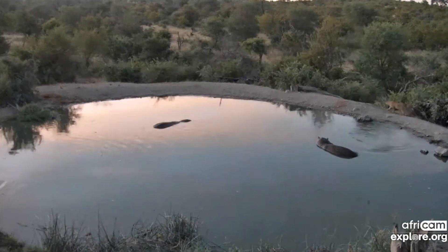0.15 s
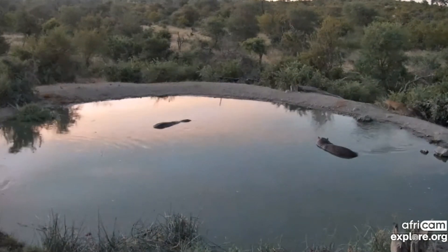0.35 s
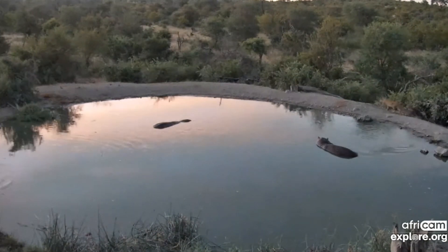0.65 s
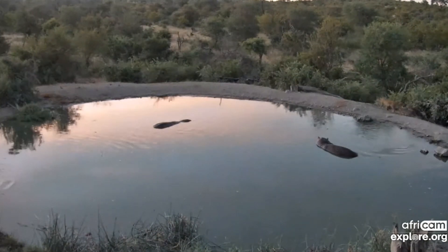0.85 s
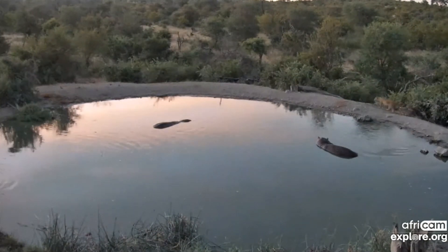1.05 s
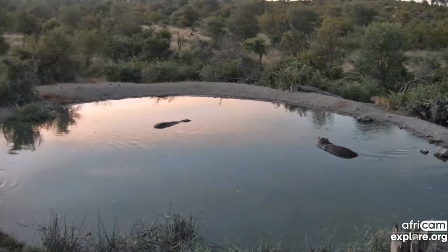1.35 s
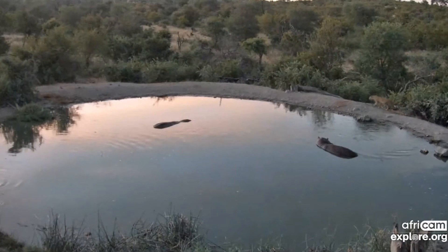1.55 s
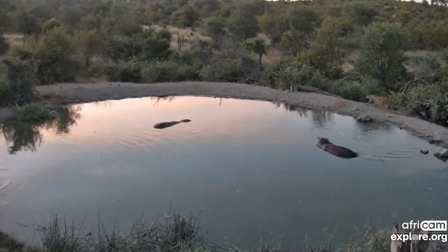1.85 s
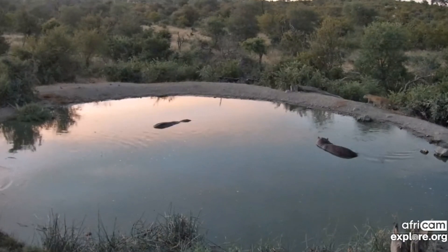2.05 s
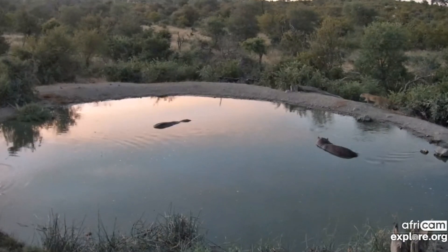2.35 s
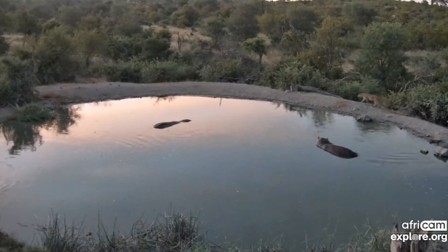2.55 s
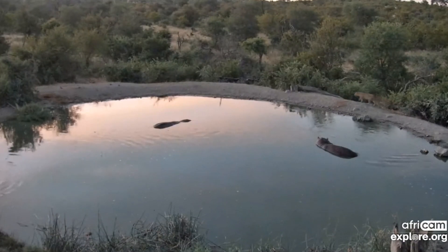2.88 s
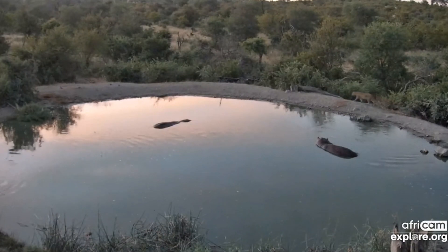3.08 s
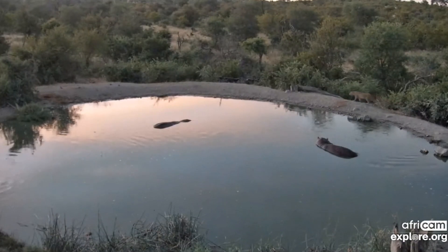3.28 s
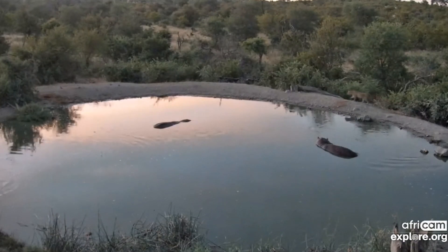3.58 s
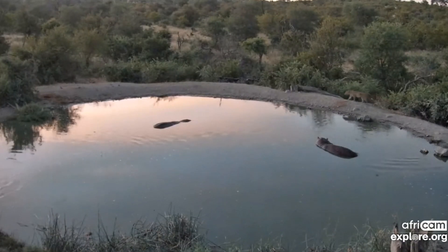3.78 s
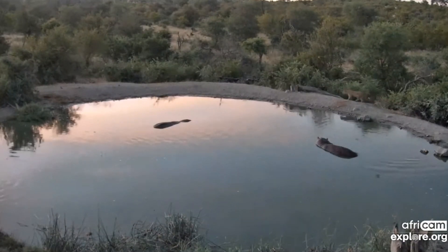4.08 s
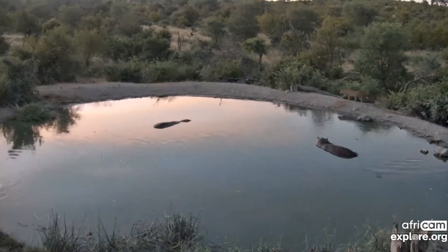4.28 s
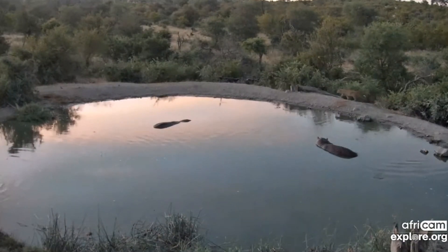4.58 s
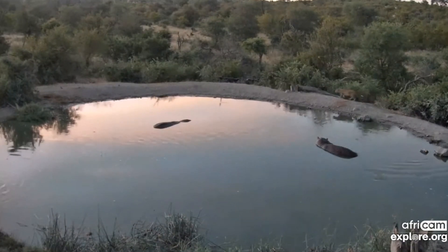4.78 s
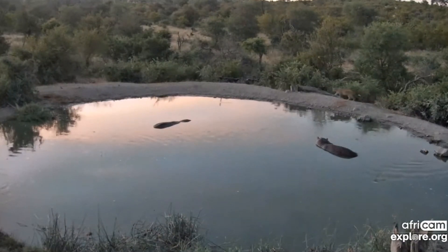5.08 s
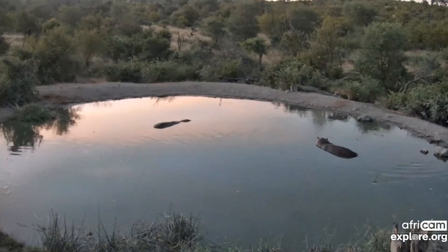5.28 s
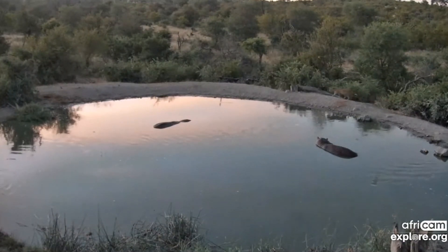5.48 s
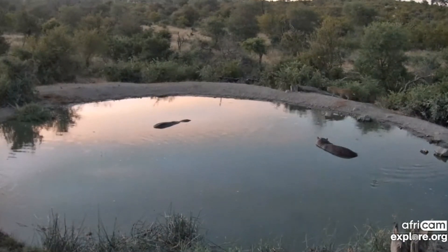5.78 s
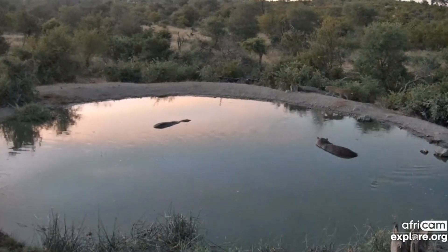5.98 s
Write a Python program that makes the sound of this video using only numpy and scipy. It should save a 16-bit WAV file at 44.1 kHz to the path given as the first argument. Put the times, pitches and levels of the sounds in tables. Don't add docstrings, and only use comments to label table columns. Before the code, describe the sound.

At a waterhole at dusk, crickets chirp steadily over a faint insect hiss and barely audible hum. A few small drips plink. A faint distant bird calls, then a nightjar whistles two rising, swooping phrases, the second ending in a rapid sinking trill. A nearer bird answers with two short nasal squawks, the second harsher. Open air, whistles echoing softly off trees, distant fixed microphone.

```python
import sys
import numpy as np
from scipy import signal
from scipy.fft import rfft, irfft
from scipy.io import wavfile
from scipy.ndimage import uniform_filter1d

SR = 44100
rng = np.random.default_rng(int(sys.argv[2]) if len(sys.argv) > 2 else 0)


def master(y):
    cut = np.clip(np.atleast_2d(y).T, -1, 1)
    pcm = np.round(cut * 32767)
    wavfile.write(sys.argv[1], SR, pcm.astype(np.int16))


def linear_from_db(decibels):
    return 10 ** (np.asarray(decibels, float) / 20)


N = 270774
TIME = np.arange(N) / SR

# frequency in Hz, level in dB.
HUM_LINES = [(75, -91), (125, -87), (150.2, -70.5), (250, -76.5), (350, -78.5)]
# frequency in Hz, density in dB per Hz.
BUSH_SPECTRUM = [(40, -42), (70, -28), (110, -15.5), (150, 0.5), (219, -6), (450, -10), (760, -19),
                 (1250, -9), (2100, -9.5), (3200, -4), (4300, -6.5), (5300, -9), (7800, -18.5),
                 (12000, -17)]
BUSH_DB = -51
# start in seconds, end in seconds, level in dB.
SINGER_SPELLS = [
    (0, .65, -66),
    (2.4, 2.702, -64),
    (3.75, 4.35, -66),
    (5.0, 5.7, -64),
]
SINGER_HZ, SINGER_WIDTH_HZ = 4207, 110
# frequency in Hz, width in Hz, level in dB.
WING_MODES = [
    (4440, 220, 12.5),
    (4720, 245, 16),
    (5030, 220, 13),
]
UPPER_WING_DB = -1.16
# start in seconds, end in seconds, level in dB, share of the low wing mode 0-1.
CHIRPS = [(0, 0.067, -53.5, 1), (0.19, .51, -58.5, .5), (.683, 0.947, -48.5, 0.9),
          (1.285, 1.694, -53.5, 0.5), (1.878, 2.163, -47.5, 0.93), (2.537, 2.778, -53.5, .5),
          (2.985, 3.256, -48.5, 0.94), (3.696, 3.894, -56, 1), (4.124, 4.32, -52, .5),
          (4.5, 4.625, -49.5, .8), (4.64, 4.854, -58, .5), (5.036, 5.292, -53.5, 0.6),
          (5.448, 5.61, -56, .8), (5.607, 5.85, -49, 1), (5.948, 6.138, -56, .5)]
# start in seconds, peak level in dB, bubble pitch in Hz, 60 dB decay time in seconds.
DRIPS = [
    (.024, -35, 1296, 0.029),
    (1.225, -43.5, 504, 0.03),
    (5.46, -38.5, 1350, 0.026),
]
# time in seconds, voice pitch in Hz, level in dB.
FAR_CALL = [
    (2.0, 520, -61),
    (2.03, 550, -60.5),
    (2.07, 584, -61),
    (2.1, 590, -64),
    (2.149, 590, -66),
    (2.18, 552, -57),
]
# time in seconds, voice pitch in Hz, level in dB, roughness 0-1.
SQUAWKS = [
    [(4.312, 670, -51, .12), (4.335, 749, -42, .18), (4.36, 858, -40, .25), (4.38, 990, -34, 0.1),
     (4.405, 1053, -33, .03), (4.445, 1077, -33, 0.08), (4.495, 1056, -33, 0.07), (4.512, 977, -38, 0.33)],
    [(4.603, 1030, -42.5, .45), (4.625, 1019, -35, 0.34), (4.655, 1033, -37, .3), (4.67, 1019, -41.5, .22),
     (4.71, 1028, -39.5, .22), (4.735, 997, -42.5, 0.46), (4.758, 945, -50, .7)],
]
# overtone of the voice, multiple of the flutter added,
# level in dB in the first squawk, level in dB in the second.
SQUAWK_LINES = [(1, 1.5, -29, -19), (2, 0, -15, -15), (2, 1, -20, -13.5), (2, 2, -9.5, -13),
                (3, 0, -0.5, -3.5), (3, 1, -21, -13), (3, 2, -9.5, -8), (3, 2.6, -21, -1.5),
                (3, 3, -15.5, -5), (4, 0, -25, -5), (4, 1, -30, -4.5), (4, 2, -27, -8.5), (4, 3, -42, -8.5)]
# frequency in Hz, gain in dB.
BEAK = [(1400, -1), (1900, -10), (2090, -1), (2500, -6), (3100, -1.5), (4300, -4), (5200, -8)]
FLUTTER_HZ = (328, 315.5)
FLUTTER_FOLLOWS = 0.1
STUTTER_END_S, STUTTER_FADE_S, STUTTER_DEPTH = 4.665, 0.033, 0.97
# frequency in Hz, gain in dB.
WINDPIPE = [(1150, -6.5), (1400, 0), (1550, 0), (1600, -1), (1640, -3.5), (1680, -2), (1730, 4.5),
            (1800, 4.5), (1950, -1.5), (2150, 4)]
# start in seconds, start pitch in Hz, time of the voice break in seconds,
# time of the top in seconds, top pitch in Hz.
FLICKS = [
    (2.53, 1496, 2.547, 2.578, 1950),
    (3.412, 1585, 3.434, 3.464, 1960),
]
FLICK_START_DB, FLICK_TOP_DB = -32.5, -29.5
# time in seconds, pitch in Hz, effort in dB.
GLIDES = [
    [(2.6, 1258, -33), (2.625, 1182, -39), (2.78, 1355, -31), (2.91, 1485, -31), (3.005, 1770, -32),
     (3.055, 2023, -33), (3.097, 2089, -29), (3.128, 1643, -31), (3.182, 1298, -30.5)],
    [(3.486, 1377, -31), (3.505, 1326, -31), (3.532, 1476, -30), (3.55, 1610, -38), (3.568, 1730, -32),
     (3.63, 1976, -31), (3.664, 2034, -31.5), (3.697, 1653, -32), (3.735, 1350, -30)],
]
# time in seconds, pitch in Hz.
TRILL_TOPS = [
    (3.773, 1960),
    (3.847, 1958),
    (3.92, 1938),
    (3.987, 1855),
    (4.048, 1802),
    (4.1, 1685),
]
TRILL_FALL_S, TRILL_LOW_HZ, TRILL_DB, TRILL_FADE_DB_PER_S = 0.034, 1417, -30.5, 6
LAST_FALL_S, LAST_HZ, LAST_DB = 0.046, 1299, -34.5
SWING_ROUND, SWING_TOP_HOLD = 0.5, 0.35
CATCH_DB, CATCH_S, CATCH_LAG_S = -15, 0.008, 0.003
BREAK_HZ, BREAK_JUMP_HZ, BREAK_WIDTH_HZ = 1639, 74.4, 29.8
BREAK_GAP, BREAK_GAP_HZ, BREAK_GAP_WIDTH_HZ = 0.64, 1625, 60.0
WAVER_HZ, WAVER_DB = 9.0, 1.1
# delay in seconds, level in dB.
BANK_ECHOES = [
    (0.028, -30),
    (0.088, -27.5),
    (0.171, -25),
    (.28, -30),
]
# start in seconds, length in seconds.
DROPOUTS = [(0.048, .02), (.1, .02), (.458, .02), (1.08, .024), (1.39, .02), (1.66, .02), (2.08, .03),
            (2.135, .022), (2.253, .05), (2.587, 0.038), (3.046, .02), (3.12, .02), (3.19, .02),
            (3.36, 0.018), (3.8, 0.084), (3.94, 0.023), (4.038, .064), (4.479, .047), (4.556, 0.023),
            (4.6, .02), (5.002, .02), (5.33, .02), (5.47, .02), (5.53, .063), (5.61, .02), (5.9, .024)]
DROPOUT_DB = -27
GAP_BAND_HZ, GAP_BAND_WIDTH_HZ = 5660, 320
TOP_HZ, BASS_CUT_HZ = 12280, 60


def at_hz(points, hz):
    return np.interp(np.log(hz), np.log(np.array(points)[:, 0]), np.array(points)[:, 1])


def in_time(rows):
    s, *columns = np.transpose(rows)
    return [np.interp(TIME, s, c) for c in columns]


def gate(start, end, fade_s):
    return np.clip(np.minimum(TIME - start, end - TIME) / fade_s, 0, 1)


def band(x, low_hz, high_hz, order=2):
    return signal.sosfilt(signal.butter(order, [low_hz, high_hz], "band", fs=SR, output="sos"), x)


def wobble(rate_hz, order=2):
    low_pass = signal.butter(order, rate_hz, fs=SR, output="sos")
    x = signal.sosfilt(low_pass, rng.standard_normal(N + 9000))[9000:]
    return x / x.std()


def tone(hz):
    return np.sqrt(2) * np.sin(2 * np.pi * np.cumsum(hz) / SR + rng.uniform(0, 2 * np.pi))


def hum():
    return sum(linear_from_db(db + 1.4 * wobble(3.1)) * tone(np.full(N, hz)) for hz, db in HUM_LINES)


def bush(patchy_db):
    hz = np.maximum(np.fft.rfftfreq(N, 1 / SR), 10)
    hiss = irfft(rfft(rng.standard_normal(N)) * linear_from_db(at_hz(BUSH_SPECTRUM, hz)), N)
    top = band(hiss, 10300, 12700)
    hiss = hiss + top * (linear_from_db(2.5 * wobble(140.0)) - 1)
    return linear_from_db(BUSH_DB + patchy_db * wobble(3.3)) * hiss / hiss.std()


def singer():
    buzz = band(rng.standard_normal(N), SINGER_HZ - SINGER_WIDTH_HZ / 2, SINGER_HZ + SINGER_WIDTH_HZ / 2)
    level = sum(linear_from_db(db) * gate(start, end, 0.08) for start, end, db in SINGER_SPELLS)
    return level * buzz / buzz.std()


def crickets():
    strokes = np.sin(np.pi * np.cumsum(57.0 + 3.5 * wobble(11.0)) / SR) ** 2
    teeth = (0.7 + strokes) * rng.standard_normal(N)
    modes = [linear_from_db(db) * band(teeth, hz - width / 2, hz + width / 2) / np.sqrt(width)
             for hz, width, db in WING_MODES]
    low = modes[0] / modes[0].std()
    upper = sum(modes[1:]) / modes[0].std()
    out = 0
    for start, end, db, low_share in CHIRPS:
        swell = np.clip((TIME - start) / (end - start) / 0.7, 0, 1)
        fade_s = 0.018 / np.clip(low_share, 0.2, 1) ** 1.5
        wing = low_share * swell ** 0.5 * low + linear_from_db(UPPER_WING_DB) * swell ** 1.3 * upper
        out = out + gate(start, end, fade_s) * linear_from_db(db - 4) * wing
    return out


def drips():
    out = 0
    for start, db, hz, t60 in DRIPS:
        t = np.maximum(TIME - start, 0)
        decay = linear_from_db(db - 60 * np.minimum(t / t60, 5))
        onset = np.minimum(t * hz / 2, 1)
        out = out + decay * onset * np.sin(2 * np.pi * hz * t)
    return out


def far_bird():
    hz, level_db = in_time(FAR_CALL)
    third = linear_from_db(-2) * np.clip((hz - 540) / 40.0, 0, 1) * tone(3 * hz)
    lines = third + tone(4 * hz) + linear_from_db(-1) * tone(5 * hz)
    return gate(FAR_CALL[0][0], FAR_CALL[-1][0], 0.011) * linear_from_db(level_db + 2.2 * wobble(40.0)) * lines


def squawks():
    out, waver, grit = 0, wobble(60.0), wobble(230.0, order=4)
    for k, rows in enumerate(SQUAWKS):
        voice_hz, level_db, rough = in_time(rows)
        flutter_hz = FLUTTER_HZ[k] + FLUTTER_FOLLOWS * (voice_hz - 1000)
        stutter = k * STUTTER_DEPTH * np.clip((STUTTER_END_S - TIME) / STUTTER_FADE_S, 0, 1)
        chop = 1 - stutter * np.cos(np.pi * 64.0 * (TIME - 4.613)) ** 2
        envelope = gate(rows[0][0], rows[-1][0], 0.0032) * linear_from_db(level_db) * chop
        gape_air = linear_from_db(7.0) * band(rng.standard_normal(N), 3300, 4900)
        out = out + envelope * rough * gape_air
        for overtone, multiple, *line_db in SQUAWK_LINES:
            waver, grit = np.roll(waver, N // 7), np.roll(grit, N // 7)
            hz = overtone * voice_hz + multiple * flutter_hz + 120.0 * rough * waver
            rasp = 1 + (0.15 + 1.7 * rough) * grit
            out = out + envelope * linear_from_db(line_db[k] + at_hz(BEAK, hz)) * rasp * tone(hz)
    return out


def phrases():
    rows = []
    for (s, hz, break_s, top_s, top_hz), glide in zip(FLICKS, GLIDES):
        flick = [(s, hz, FLICK_START_DB), (break_s, BREAK_HZ, FLICK_START_DB), (top_s, top_hz, FLICK_TOP_DB)]
        rows.append(flick + glide)
    for s, hz in TRILL_TOPS:
        db = TRILL_DB - TRILL_FADE_DB_PER_S * (s - TRILL_TOPS[0][0])
        rows[1] += [(s, hz, db), (s + TRILL_FALL_S, TRILL_LOW_HZ, db)]
    rows[1][-1] = (s + LAST_FALL_S, LAST_HZ, LAST_DB)
    return rows


def voiced(turns, eased):
    tension = np.arange(800.0, 2600.0)
    pitch = tension + BREAK_JUMP_HZ * np.tanh((tension - BREAK_HZ) / BREAK_WIDTH_HZ)
    s, hz = np.transpose(turns)
    index = np.arange(len(s))
    place = np.interp(TIME, s, index)
    rounding = SWING_ROUND * np.sin(2 * np.pi * place) / 2
    top_hold = SWING_TOP_HOLD * np.sin(np.pi * place)
    place = place - eased * (rounding + top_hold) / np.pi
    tension_now = np.interp(place, index, np.interp(hz, pitch, tension))
    return np.interp(tension_now, tension, pitch)


def nightjar():
    out = 0
    trilling = (TIME > GLIDES[1][-1][0]) & (TIME < TRILL_TOPS[-1][0])
    catch_db = CATCH_DB * np.exp(-((TIME - TRILL_TOPS[-1][0] - CATCH_LAG_S) / CATCH_S) ** 2)
    for turns in phrases():
        start, end = turns[0][0], turns[-1][0]
        hz = uniform_filter1d(voiced([row[:2] for row in turns], trilling), size=int(0.011 * SR))
        hz = hz + WAVER_HZ * wobble(25.0)
        halo = linear_from_db(-20) * wobble(480.0, order=5) * linear_from_db(2 * wobble(15.0))
        windpipe_db = uniform_filter1d(at_hz(WINDPIPE, hz), size=40)
        level = linear_from_db(in_time(turns)[1] + catch_db + WAVER_DB * wobble(30.0) + windpipe_db)
        gap = BREAK_GAP * np.exp(-((hz - BREAK_GAP_HZ) / BREAK_GAP_WIDTH_HZ) ** 2)
        level = level * (1 - trilling * gap)
        whistle = gate(start, end, 0.0026) * level * tone(hz)
        out = out + whistle + band(whistle * halo, 750, 2350, order=5)
        high_voice = gate(start, end, 0.003) * level * np.clip((hz - 1450.0) / 95.0, 0, 1)
        out = out + linear_from_db(-1.5) * high_voice * band(rng.standard_normal(N), 1850, 2220, order=3)
    return out


def trees(x, t60, onset_s):
    t = TIME[:SR]
    shape = linear_from_db(-60 * t / t60) * (1 - np.exp(-t / onset_s))
    shape = shape + sum(linear_from_db(db + 22) * np.exp(-((t - lag) / 0.0088) ** 2) for lag, db in BANK_ECHOES)
    tail = rng.standard_normal(SR) * shape
    scattered = signal.fftconvolve(x, tail / np.sqrt(np.sum(tail ** 2)))[:N]
    scattered = scattered * (0.94 + 0.32 * wobble(120.0))
    return band(band(scattered, 1800, 6000, order=1), 1380, 9000, order=4)


def scene():
    background = hum() + bush(patchy_db=0.03) + singer() + crickets()
    calls = drips() + far_bird() + squawks()
    song = nightjar()
    song_scatter = linear_from_db(-8.5) * trees(song, t60=0.99, onset_s=0.0048)
    call_scatter = linear_from_db(-20) * trees(calls, t60=0.18, onset_s=0.0049)
    return (background + calls + song + song_scatter + call_scatter)[None]


def roll_off(x):
    return signal.sosfilt(signal.butter(12, 13170, fs=SR, output="sos"), x)


def record(dry):
    lost = sum(gate(s, s + length, 0.004) * (1 - linear_from_db(DROPOUT_DB)) for s, length in DROPOUTS)
    hz = np.fft.rfftfreq(N, 1 / SR)
    spectrum = rfft(dry) * (hz < TOP_HZ) / np.sqrt(1 + (BASS_CUT_HZ / (hz + 1)) ** 4)
    gap_band = irfft(spectrum * np.exp(-((hz - GAP_BAND_HZ) / GAP_BAND_WIDTH_HZ) ** 6), N)
    return roll_off(irfft(spectrum, N) - lost * gap_band)


dry = scene()
out = record(dry)
master(out)
```